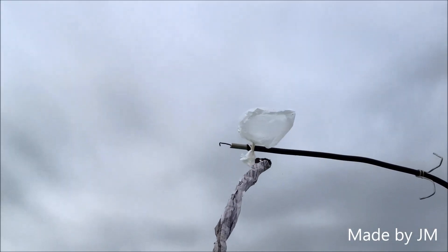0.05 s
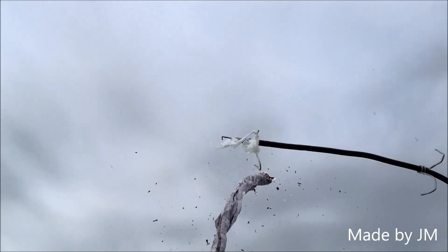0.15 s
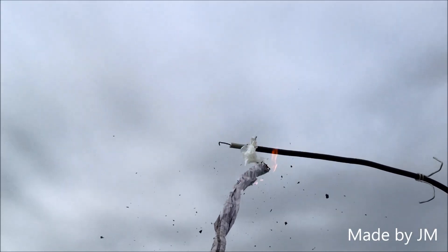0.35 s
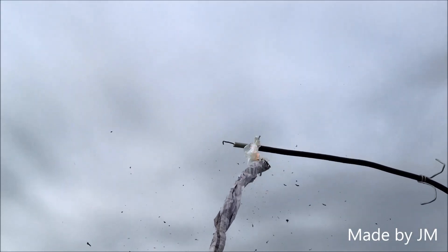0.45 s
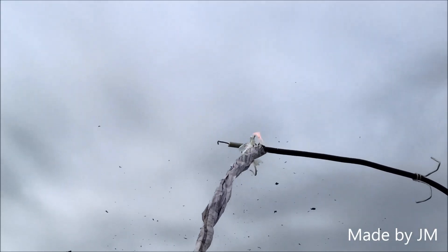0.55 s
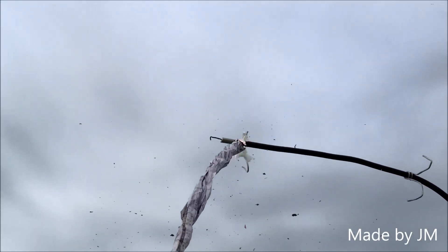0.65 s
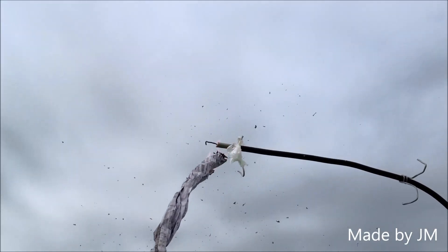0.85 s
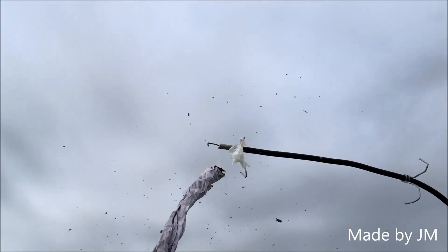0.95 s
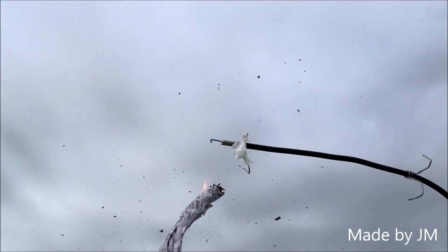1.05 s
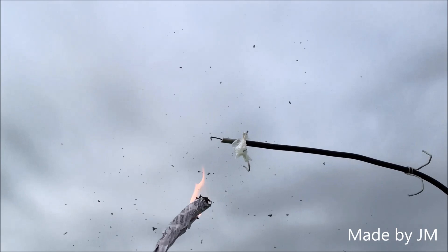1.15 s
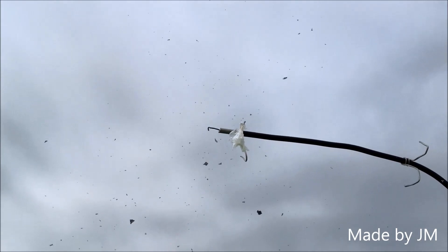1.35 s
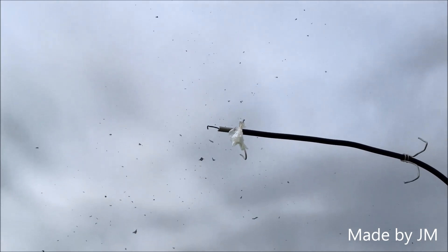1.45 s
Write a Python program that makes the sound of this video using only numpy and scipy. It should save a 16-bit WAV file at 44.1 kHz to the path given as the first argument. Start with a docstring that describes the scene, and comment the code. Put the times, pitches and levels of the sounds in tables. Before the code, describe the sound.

A small gas balloon explodes with one sharp, loud bang at about 0.2 seconds, just after a faint hiss and sputter of torch flame. The blast overloads the microphone, and quick wall echoes and a low boom fade by about 1.2 seconds. Debris tinks faintly on metal between 0.5 and 1 second. Two soft bumps follow around 1.2 and 1.3 seconds, over low outdoor noise.

```python
"""A yard with two facing walls, one microphone, low outdoor noise. A torch lights a small gas balloon:
the flame hisses and sputters, then one sharp blast overloads the microphone. Nearby surfaces throw
the shock back, the two walls pass it to and fro, and the yard booms and dies away.
In the tail, bits of debris tink on metal and something bumps softly."""
import sys
import numpy as np
from scipy import signal
from scipy.fft import rfft, irfft
from scipy.io import wavfile

SR = 44100
rng = np.random.default_rng(int(sys.argv[2]) if len(sys.argv) > 2 else 0)


def file_out(sig):
    """Save sig as 16-bit WAV at sys.argv[1]."""
    # one column per channel
    cols = np.atleast_2d(sig).T
    # limit, then scale
    lim = np.clip(cols, -1, 1)
    pcm = np.round(lim * 32767).astype(np.int16)
    wavfile.write(sys.argv[1], SR, pcm)


N = 66150

BANG_S = 0.214
ECHO_CRACKLE_T60_S = .012  # rough walls spread the crackle
# spectrum of the crackle behind each shock front (frequency [Hz], relative level [dB])
CRACKLE_SPECTRUM = [(60, -35), (200, -12), (700, 2), (1300, 7), (1800, 4), (2400, -6), (3100, 2), (4600, 1),
                    (7500, -4), (9500, -17), (12000, -14), (16000, -16)]


def undb(db):
    """Decibels to gain."""
    return 10 ** (np.asarray(db) / 20)


def unit(x):
    """Scale to rms 1."""
    return x / np.sqrt(np.mean(x ** 2))


def since(start):
    """Seconds since a moment, zero before it."""
    return np.maximum(np.arange(N) / SR - start, 0)


def fade(start, rise, t60):
    """Quick rise and exponential decay, times in seconds."""
    t = since(start)
    return (1 - np.exp(-t / rise)) * np.exp(-np.log(1000) * t / t60)


def curve_at(points, hz):
    """Interpolate (Hz, value) points on a log-frequency axis."""
    p = np.array(points, float)
    return np.interp(np.log(hz + 1), np.log(p[:, 0]), p[:, 1])


def colour(x, points):
    """Minimum-phase filter with the given (Hz, dB) response."""
    hz = np.arange(N + 1) * SR / (2 * N)
    cepstrum = irfft(np.log(undb(curve_at(points, hz))))
    cepstrum[1:N] *= 2
    cepstrum[N + 1:] = 0
    return irfft(rfft(x, 2 * N) * np.exp(rfft(cepstrum)))[:N]


def noise(points):
    """Noise of rms 1 with a (Hz, dB) spectrum."""
    gain = undb(curve_at(points, np.arange(N // 2 + 1) * SR / N))
    return unit(irfft(rfft(rng.standard_normal(N)) * gain, N))


def band(x, hz, octaves):
    """A bell-shaped band of x at rms 1."""
    f = (np.arange(N // 2 + 1) + .5) * SR / N
    bell = np.exp(-.5 * (np.log2(f / hz) / octaves) ** 2)
    return unit(irfft(rfft(x) * bell, N))


def ring(modes, start, rise):
    """Decaying sines, one for each (Hz, dB, t60) mode."""
    return sum(undb(db) * fade(start, rise, t60) * np.sin(2 * np.pi * hz * since(start))
               for hz, db, t60 in modes)


def background():
    """Low, steady outdoor noise around the microphone."""
    # ambience of the yard (frequency [Hz], relative level [dB])
    spectrum = [(30, -50), (70, -24), (125, -6), (175, -1), (235, 4), (290, 0), (340, -12), (430, -7),
                (520, -4.5), (680, -2.5), (760, -7), (860, -16), (1300, -16), (1900, -22), (2400, -29),
                (4000, -29.5), (5600, -31.5), (8000, -33), (9700, -39), (12500, -35), (15000, -33)]
    return undb(-58.5) * noise(spectrum)


def flame():
    """The flame hisses and spits until the blast smothers it."""
    # hiss of the flame (frequency [Hz], relative level [dB])
    spectrum = [(60, -22), (150, 2), (230, 8), (400, -4), (1300, 0), (2500, -12), (4400, -11), (5500, -15),
                (8000, -14), (10000, -19), (15000, -20)]
    spits_per_s = 450
    spits = (rng.random(N) < spits_per_s / SR) * rng.exponential(size=N)
    envelope = signal.fftconvolve(spits, fade(0, rise=.0003, t60=.008))[:N]
    crackle = unit(envelope * band(rng.standard_normal(N), hz=5500, octaves=1))
    smother = np.exp(-since(BANG_S) / .05)
    return smother * (undb(-60) * noise(spectrum) + undb(-67) * crackle)


def sputters_and_bumps():
    """The flame sputters before the blast; faint ticks and soft bumps come after it."""
    # noise bursts (time [s], level [dB], centre [Hz], width [octaves], t60 [s])
    bursts = [(0.052, -61, 6000, .7, .1), (0.099, -47, 1400, .7, .1), (0.149, -50, 1200, 1.2, .11),
              (0.806, -65, 5600, .2, .03), (1.015, -56, 1200, .35, .06), (1.210, -44.5, 520, .4, .08),
              (1.332, -54, 450, .6, .04)]
    return sum(undb(db) * fade(start, .002, t60) * band(rng.standard_normal(N), hz, width)
               for start, db, hz, width, t60 in bursts)


def shock(start, pressure_db, crackle_db, crackle, t60):
    """One front: a jump in pressure, a suction behind it, and a short crackle."""
    # tone of the pressure pulse (frequency [Hz], gain [dB])
    pulse_tone = [(30, -46), (70, -29), (130, -7), (245, 7), (350, -7), (620, -2), (880, -5), (1300, 3),
                  (1700, -5), (2300, -19), (5000, -17), (8000, -21), (10000, -32), (16000, -34)]
    overpressure_s = .001
    t = since(start) / overpressure_s
    pulse = (t > 0) * (1 - t) * np.exp(-t)
    tail = crackle * fade(start + .001, rise=.0003, t60=t60)
    return undb(pressure_db + 11) * colour(pulse, pulse_tone) + undb(crackle_db - 4) * tail


def blast():
    """The direct shock reaches the microphone, then its reflections from nearby surfaces."""
    # arrivals (time [s], pressure gain [dB], crackle gain [dB])
    fronts = [(0.2141, -5, 2), (0.2169, 2, 0), (0.2186, 1, -5), (0.2221, -11, -9), (0.2243, -7, -7),
              (0.2345, -21, -17), (0.2375, -22, -15), (0.2402, -15, -16), (0.2445, -15, -14),
              (0.2570, -27, -17), (0.2625, -17, -14)]
    crackle = noise(CRACKLE_SPECTRUM)
    return sum(shock(*front, crackle, t60=.008) for front in fronts)


def yard_reverb():
    """Dense small echoes: a fast decay from close by, a slow one from farther off."""
    # scattered sound (frequency [Hz], early level [dB], early t60 [s], late level [dB], late t60 [s])
    decays = [(40, -64, .15, -88, 1), (80, -44, .17, -61, 1.1), (140, -20, .23, -40, 1.2),
              (250, -24, .28, -32.5, 1.15), (350, -35, .22, -45, 1.1), (600, -24, .27, -32.5, 1.1),
              (850, -40, .2, -48.5, 1.25), (1300, -33, .19, -42, 1.35), (1800, -36, .19, -45, 1.25),
              (2400, -41, .2, -52, 1.1), (3800, -34, .24, -47, 1), (7000, -36, .22, -53, .66),
              (10000, -45, .22, -61, .58), (15000, -46, .22, -65, .48)]
    table, out = np.array(decays, float), 0
    build_s, graininess = .016, .25
    grain = np.exp(graininess * np.repeat(rng.standard_normal(N // 44 + 1), 44)[:N])  # 1 ms steps
    for hz in 40 * 2 ** np.arange(0, 8.8, 1 / 3):  # third-octave bands
        early_db, early_t60, late_db, late_t60 = (curve_at(table[:, [0, k]], hz) for k in range(1, 5))
        early = undb(early_db) * fade(BANG_S, build_s, early_t60)
        late = undb(late_db) * fade(BANG_S, build_s, late_t60)
        out = out + (early + late) * band(grain * rng.standard_normal(N), hz, octaves=1 / 6)
    return out


def boom():
    """The yard's low resonances ring on after the blast."""
    # resonances (frequency [Hz], level [dB], t60 [s])
    yard_modes = [(166, -13, .25), (218, -13, .28), (264, -11, .29), (409, -31, .42), (558, -27, .38),
                  (636, -24, .32), (686, -30, .33)]
    return ring(yard_modes, BANG_S + .010, rise=.02)


def slaps():
    """Other surfaces each send back a single dull echo of the shock."""
    # arrivals (time [s], pressure gain [dB], crackle gain [dB])
    echoes = [(0.3000, -32, -20), (0.4375, -36, -32)]
    # tone of these surfaces (frequency [Hz], gain [dB])
    surface_tone = [(50, -20), (200, -5), (900, -3), (1400, 2), (2000, 0), (3500, -7), (8000, -11),
                    (16000, -11)]
    crackle = noise(CRACKLE_SPECTRUM)
    return colour(sum(shock(*echo, crackle, ECHO_CRACKLE_T60_S) for echo in echoes), surface_tone)


def flutter():
    """The shock runs between two facing walls, losing treble to the air with distance."""
    # returns to the microphone (time [s], pressure gain [dB], crackle gain [dB])
    returns = [(0.3118, -35, -14), (0.3620, -24, -18), (0.4121, -35, -27), (0.4611, -47, -31),
               (0.5111, -49, -31), (0.6103, -55, -39), (0.6607, -57, -38), (0.7598, -63, -44),
               (0.8093, -65, -46)]
    # tone of the returns before air loss (frequency [Hz], gain [dB])
    wall_tone = [(50, -24), (200, 1), (850, -7), (1400, 0), (2400, -3), (3600, 2), (5200, -6), (6200, 3),
                 (8000, 2), (10000, -5), (16000, -5)]
    air_db_per_s, air_hz = 42, 7500  # loss rate at this frequency
    crackle, out = noise(CRACKLE_SPECTRUM), 0
    for start, pressure_db, crackle_db in returns:
        loss_db = air_db_per_s * (start - BANG_S)
        far_tone = [(hz, db - loss_db * (hz / air_hz) ** 2) for hz, db in wall_tone]
        echo = shock(start, pressure_db, crackle_db, crackle, ECHO_CRACKLE_T60_S)
        out = out + colour(echo, far_tone)
    return out


def debris():
    """Small bits tick against the same piece of metal and ring it."""
    # modes of the metal (frequency [Hz], relative level [dB], t60 [s])
    metal_modes = [(7020, -2, .11), (7490, -8, .1), (7555, 0, .16), (8180, -9, .06), (9560, -12, .13),
                   (9760, -9, .07), (11100, -11, .07), (11850, -12, .06), (13250, -16, .06)]
    # debris landing (time [s], level [dB])
    landings = [(0.5470, -61), (0.647, -70), (0.687, -66), (0.979, -68)]
    contact, out = band(rng.standard_normal(N), hz=10000, octaves=.35), 0
    for start, db in landings:
        tick = fade(start, rise=.001, t60=.035) * contact
        out = out + undb(db) * (ring(metal_modes, start, rise=.002) + tick)
    return out


def scene():
    """Everything that reaches the microphone, in mono."""
    explosion = blast() + flutter() + slaps() + yard_reverb() + boom()
    return (explosion + debris() + sputters_and_bumps() + flame() + background())[None]


def record(dry):
    """The microphone overloads on the blast; the deepest bass and the top are cut."""
    ceiling, low_cut_hz, top_hz = .95, 40, 15300
    overloaded = ceiling * np.tanh(dry / ceiling)
    low_cut = signal.butter(1, low_cut_hz, "high", fs=SR, output="sos")
    high_cut = signal.ellip(8, .2, 70, top_hz, fs=SR, output="sos")
    return signal.sosfilt(high_cut, signal.sosfilt(low_cut, overloaded))


dry = scene()
out = record(dry)
file_out(out)
```